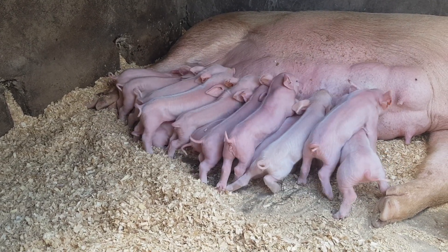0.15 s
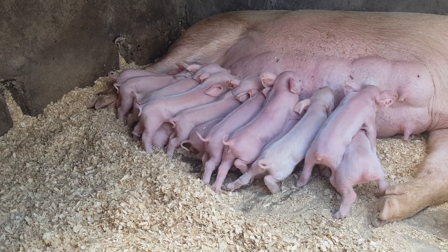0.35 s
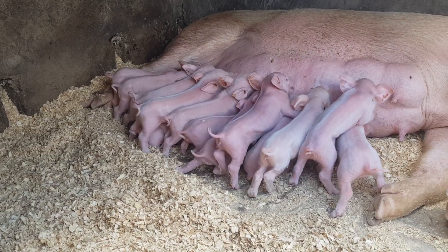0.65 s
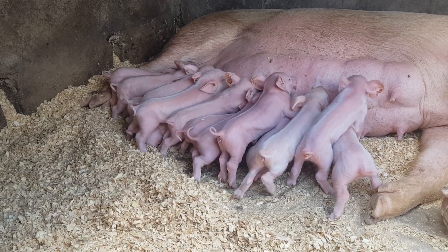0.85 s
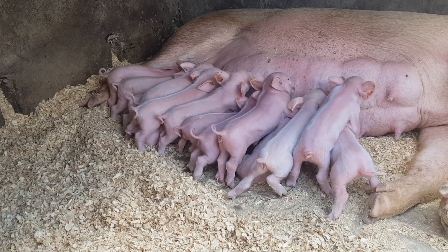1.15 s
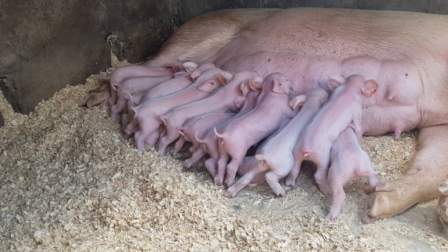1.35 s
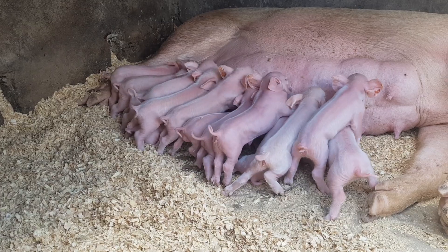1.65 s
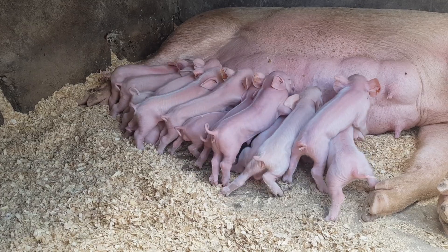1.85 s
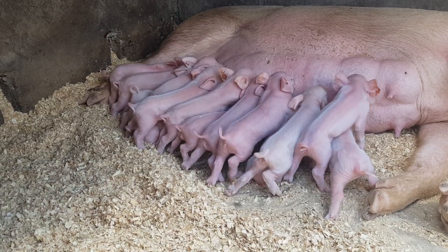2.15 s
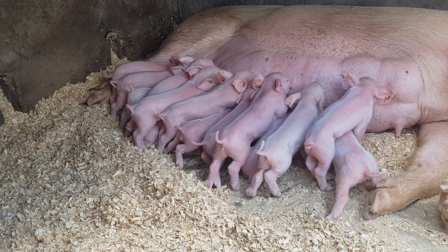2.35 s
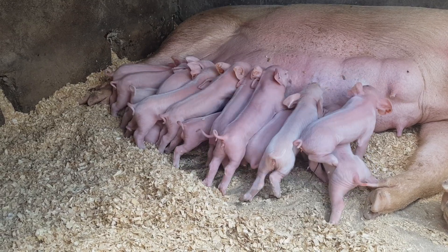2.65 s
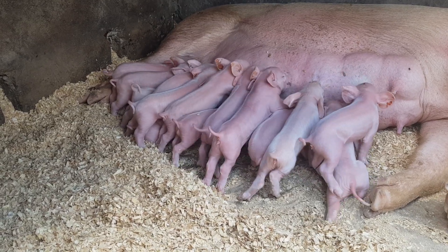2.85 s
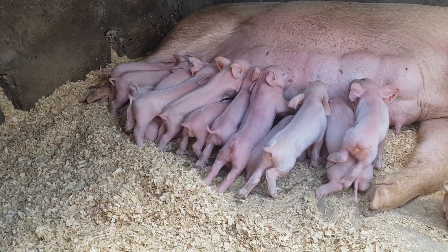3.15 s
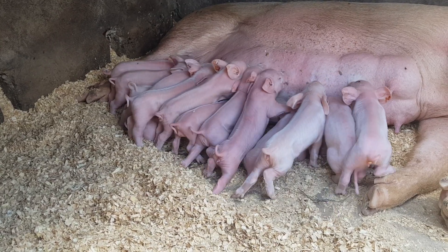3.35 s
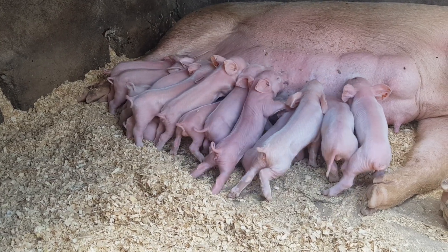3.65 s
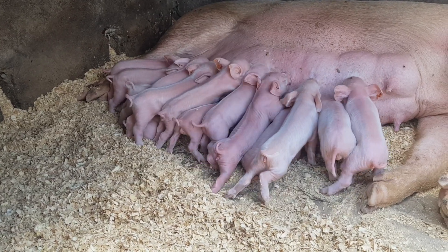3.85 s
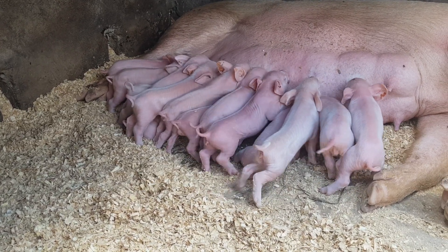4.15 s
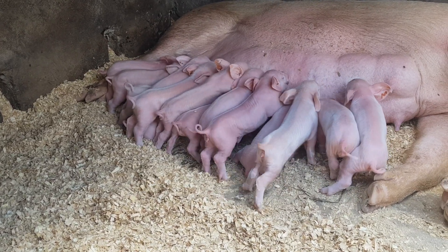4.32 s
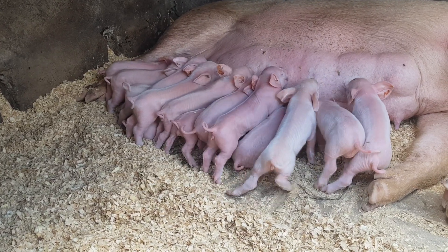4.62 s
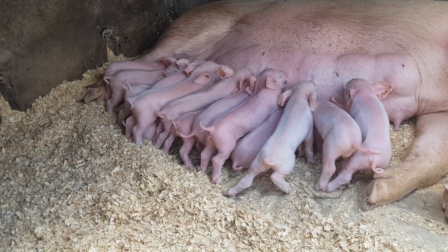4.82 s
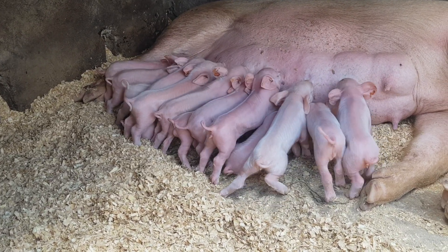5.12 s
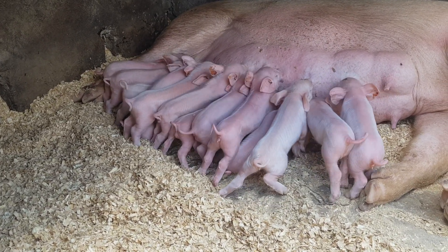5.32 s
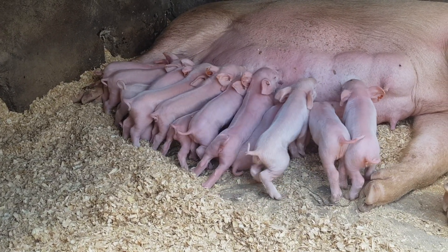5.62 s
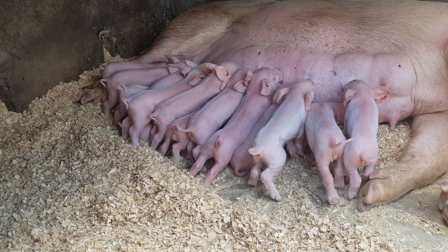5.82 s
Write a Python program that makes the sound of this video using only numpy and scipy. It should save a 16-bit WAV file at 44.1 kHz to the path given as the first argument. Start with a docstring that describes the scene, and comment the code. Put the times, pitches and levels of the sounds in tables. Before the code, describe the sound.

Low pulsing pig grunts, well spaced, over soft wet suckling, crackling bedding and a faint shed rumble, with tiny squeaks and wind bumps.

```python
"""Throughout, a shed rumbles low under jostling bodies, the sow's snuffling breath, suckling mouths and
rustling shavings. Soft calls are scattered throughout: wavering tones with one overtone. A sow in a concrete
pen gives four grunts, each a handful of slow vocal-fold flaps, about thirty a second, that swell, hold and die
away; they ring her chest, throat and snout and echo off the walls. Here and there bursts of tiny impulses make
wet smacks and dry scuffs, and slow swings of air pressure buffet the microphone. Late on come thin fluttering
whistles, most sliding down."""
import sys
import numpy as np
from scipy import signal
from scipy.fft import rfft, irfft, next_fast_len
from scipy.io import wavfile
from scipy.ndimage import uniform_filter1d

SR = 44100
rng = np.random.default_rng(int(sys.argv[2]) if len(sys.argv) > 2 else 0)


def dump(signal):
    """Clip the signal to [-1, 1] and save it as 16-bit WAV at the path in sys.argv[1]."""
    limited = np.clip(np.atleast_2d(signal).T, -1, 1)
    pcm = np.round(limited * 32767).astype(np.int16)
    wavfile.write(sys.argv[1], SR, pcm)


N = 263718
TIME = np.arange(N) / SR

# spectra of the steady beds, only their shape counts: (frequency [Hz], density [dB per Hz])
RUMBLE_SPECTRUM = [(18, -38), (32, -15.5), (45, 5), (62, -1.5), (100, -1.5), (135, -24), (220, -43)]
BODIES_SPECTRUM = [(80, -15), (135, 4.5), (180, -5.5), (260, -4), (400, -12.5), (650, -33)]
SNUFFLE_SPECTRUM = [(250, -30), (420, 4), (520, 0.5), (640, -1), (900, 0), (1080, -7.5), (1400, -15),
                    (2200, -30)]
SHAVINGS_SPECTRUM = [(3300, -27), (4200, -9), (5000, -7), (6300, -3.5), (7500, -14.5), (8600, -17),
                     (10500, -9.5), (12000, -7), (14000, -13), (15700, -14)]
SUCKLING_SPECTRUM = [(800, -1.5), (1400, -1.5), (2200, 2), (3000, 2), (3700, 0.5), (4600, -1.5), (6000, -4)]
# levels the beds hover around: (time [s], level [dB])
RUMBLE_LEVEL = [(0, -51), (.2, -42.5), (.6, -53.5), (1.6, -50.5), (3.9, -53), (4.1, -56.5), (4.6, -51),
                (5.1, -56.5), (5.25, -46.5), (5.98, -54)]
JOSTLING_LEVEL = [(0.0, -60), (0.8, -65.5), (1.89, -55.5), (2.59, -64.5), (2.79, -49.5), (3.49, -66.5),
                  (3.59, -53), (3.79, -65), (3.89, -54.5), (4.09, -66.5), (4.68, -53.0), (4.78, -59),
                  (5.08, -69.0), (5.98, -62)]
SNUFFLING_LEVEL = [(0.0, -66.5), (0.6, -56.5), (0.7, -72), (0.8, -58), (0.9, -67), (1.0, -61.5), (1.1, -70),
                   (1.59, -53.5), (2.19, -64.5), (3.39, -58.5), (3.99, -53), (4.09, -63.5), (4.58, -57.5),
                   (4.68, -72.5), (4.98, -60), (5.98, -62)]
RUSTLE_LEVEL = [(0, -56), (.8, -55.5), (.9, -54), (1.3, -57), (2, -56.5), (3.29, -54), (3.59, -59),
                (3.89, -53.5), (4.09, -59.5), (4.39, -55.5), (4.78, -60.5), (5.15, -56.5), (5.98, -56.5)]
SUCKLING_LEVEL = [(0, -58.5), (.25, -62.5), (.6, -58), (.9, -55.5), (1.5, -63), (1.6, -57.5), (2.99, -57.5),
                  (3.59, -61.5), (3.89, -56.5), (4.2, -68), (4.39, -56), (4.5, -62.5), (5.48, -58),
                  (5.98, -62.5)]
# soft closed-mouth grunts and piglet squeaks, levels before the swell: (time [s], length [s], start pitch [Hz],
# end pitch [Hz], level [dB], overtone against fundamental [dB], roughness [0 = steady])
CALLS = [(0.098, 0.14, 175, 165, -45.5, -48, 0.42), (0.104, 0.07, 404, 487, -48, -16, 0.54),
         (1.723, 0.13, 185.7, 171, -38.5, -34, 0.37), (1.81, 0.12, 173, 168, -49, -24.5, 0.97),
         (4.417, 0.088, 276.5, 242, -50, -14, 1.2), (4.517, 0.12, 198.7, 172, -56, -16, 0.84),
         (4.983, 0.075, 852, 876, -46.5, -34, 0.13), (5.652, 0.07, 498, 730, -49.5, -16, 1.12),
         (5.712, 0.033, 440, 358, -43, -13, 1.1)]
# the sow's grunts: (time of first strong flap [s], flap rate [Hz], rate glide [Hz/s], soft lead-in [s],
# lead-in against the grunt [dB], push [s], throat drive [dB], chest drive [dB])
GRUNTS = [(0.3176, 30.12, 20, 0.074, -14.5, 0.08, -23.5, -27),
          (1.31, 30.47, 41.6, 0.044, -7.5, 0.051, -33, -37),
          (2.8495, 30.46, 0.87, .11, -12, 0.048, -22, -28),
          (5.3094, 30.47, 12.5, 0.043, -23, 0.065, -26, -31)]
# resonances of the sow and her corner of the pen:
# (frequency [Hz], width [Hz], level [dB], left minus right [dB])
CHEST = [(44.4, 12, 2, 8), (62.8, 10.6, -2, 0), (107, 22, -5.5, 1), (117, 12, -3, 2), (150, 8.2, -14, 12),
         (185.6, 14.8, 2.5, 3.5), (192, 32, -23.5, 12)]
THROAT = [(270, 14, -5, 2), (348, 9, -5, -1), (417, 14, -13, 0), (482, 15, 3, 3), (543, 18, -1, 7),
          (633, 18, -13, 4), (754, 35, -6, 4), (850, 45, -6, 3), (884, 40, -3, 3), (932, 45, -6, 3)]
SNOUT = [(1070, 160, -13.5, 26), (1494, 94, -1, -6), (1810, 140, -29, 7), (2150, 150, 8.5, -2.5),
         (2290, 69, 1, 8), (2613, 70, -3.5, -19), (2770, 25, -7, -15), (3150, 35, -22, -5),
         (3093, 130, 1.5, -4)]
# flares of the snout as a grunt opens or closes: (time [s], drive [dB])
SNORTS = [(0.282, -52.5), (0.311, -22.5), (0.439, -42.5), (1.271, -45), (1.306, -48), (1.338, -40),
          (2.813, -45.5), (2.845, -35), (2.943, -39), (5.305, -36.5), (5.4, -45.5)]
# spectrum of the air torn by each flap: (frequency [Hz], density [dB per Hz])
RASP_SPECTRUM = [(700, -10), (920, 10.5), (1200, 1.5), (1800, -5), (3200, 0), (4200, -14), (6500, -24)]
# spectrum of breath through the nostrils: (frequency [Hz], density [dB per Hz])
HISS_SPECTRUM = [(2500, -2), (3600, -1.0), (4500, 0.5), (6000, -8.0), (7500, -21.5), (12000, -23)]
# wet smacks of mouths on teats, then trotters scuffing the shavings: (time [s], rise [s], decay [s],
# centre [Hz], width to either side [octaves], level [dB], left minus right [dB])
SMACKS = [(.69, 0.0033, 0.013, 2340, 0.47, -50.5, -4), (.718, 0.0039, 0.014, 2020, 0.53, -41, -1),
          (.722, 0.0032, 0.019, 710, 0.75, -41.5, 0), (.76, .003, 0.01, 970, 0.29, -48, 0),
          (.965, 0.0016, 0.011, 835, 0.27, -48.5, 0), (1.745, 0.011, 0.057, 2660, 0.33, -52.5, 1),
          (2.395, 0.0064, 0.085, 600, 1, -58, 9), (3.185, 0.0054, 0.039, 1180, 0.16, -51, -4),
          (4.332, 0.0017, 0.028, 1000, 0.27, -48, 1), (4.975, 0.0028, 0.0063, 1060, 0.58, -50, -7)]
SCUFFS = [(.605, 0.015, 0.019, 5460, 0.21, -46, -5), (.848, 0.0049, 0.016, 6300, 0.16, -49.5, -5),
          (.915, .008, 0.018, 7200, 0.19, -55, 0), (1.4546, 0.0025, 0.0095, 7000, 1, -48.5, 3),
          (1.6067, .001, .006, 5400, 0.23, -48, -4), (2.982, 0.0021, 0.032, 4400, 0.36, -41.5, -2),
          (3.21, 0.0074, 0.038, 5900, .35, -51.5, -5), (3.296, .002, 0.017, 11200, 0.31, -51, 2),
          (3.882, 0.0088, 0.011, 11900, 0.26, -41.5, 3), (4.91, 0.027, 0.049, 11900, 0.27, -47, 0),
          (4.925, 0.042, 0.03, 5630, 0.23, -46.5, -5), (5.733, 0.0033, 0.02, 5750, 0.24, -50.5, -4)]
# puffs of air on the microphone: (time of the middle [s], half length [s], eddy rate [Hz], peak [dB],
# left minus right [dB])
PUFFS = [(1.224, 0.031, 56.8, -30, 29), (1.293, 0.02, 52, -29, -23), (2.398, .018, 61, -35, 26),
         (2.57, 0.023, 51.2, -38, 17), (5.684, 0.016, 83.6, -14, -44), (5.722, 0.027, 145.6, -35.5, -30),
         (5.749, 0.026, 70.5, -28, -33), (5.803, 0.013, 72, -22, -37), (5.847, .02, 65, -32, -33),
         (5.917, 0.026, 61, -25, -29)]
# thin whistles: (time of the peak [s], rise [s], fall [s], start pitch [Hz], end pitch [Hz], peak [dB])
WHISTLES = [(4.735, .175, .2, 2154, 2022, -50.5), (4.965, 0.051, 0.041, 2050, 2055, -59),
            (5.122, 0.045, .07, 2100, 1990, -64), (5.97, .14, 0.07, 2180, 2115, -63)]

# every grunt swells to a crest, holds while she pushes, then dies away
CREST_S, SWELL_DB_PER_S, RELEASE_DB_PER_S, RELEASE_S = 0.022, 147, 346, .1
# the chest swells more gently, lets go later, and takes only a share of the lead-in's softness
CHEST_LAG_S, CHEST_SWELL_DB_PER_S, CHEST_LEAD_SHARE = 0.026, 59, .35
SNOUT_DB, RASP_DB = -20, -19.5  # snout drive and rasp, relative to the throat drive
SNORT_FALL_DB_PER_S = 275
WHISTLE_FADE_DB, WHISTLE_ROUNDNESS = 22, 1.2  # fall from the peak to either end; power of that fall
TOP_HZ = 15600


def undb(db):
    """Decibels to gain."""
    return 10 ** (np.asarray(db) / 20)


def unit(x):
    """Scale to an rms of one."""
    return x / np.sqrt(np.mean(x ** 2) + 1e-20)


def sides(pan_db):
    """Left and right gains of constant power, as a column."""
    return unit(undb(np.array([[pan_db], [-pan_db]]) / 2))


def level_curve(rows):
    """A level table joined by straight lines in time, in dB."""
    s, db = np.transpose(rows)
    return np.interp(TIME, s, db)


def add(out, s, sound):
    """Mix a stereo sound in at a time."""
    i = max(int(s * SR), 0)
    out[:, i:i + sound.shape[1]] += sound[:, :max(N - i, 0)]


def colour(x, spectrum):
    """Give a sound a spectrum and an rms of one."""
    size = next_fast_len(N)
    hz, db = np.transpose(spectrum)
    log_hz = np.log(np.fft.rfftfreq(size, 1 / SR) + 1)
    gain = undb(np.interp(log_hz, np.log(hz), db, left=-90, right=-90))
    return unit(irfft(rfft(x, size) * gain, size)[..., :N])


def walk(rate):
    """Random levels, each held 1 / rate s, then smoothed twice; spread near one."""
    k = int(SR / rate)
    steps = np.repeat(rng.standard_normal(N // k + 1), k)
    return 1.3 * uniform_filter1d(uniform_filter1d(steps, k), k)[:N]


def stereo_noise(likeness):
    """Left and right noise with a share of their power in common."""
    c = np.clip(likeness, 0, .99)
    return np.sqrt(c) * rng.standard_normal(N) + np.sqrt(1 - c) * rng.standard_normal((2, N))


def pen(x, tail_db, t60, echo=0., lag_s=0.):
    """Concrete pen: direct sound, right side late by the lag, a slap off the back wall and a diffuse tail."""
    t = np.arange(SR // 2) / SR
    tail = rng.standard_normal((2, len(t))) * np.exp(-np.log(1000) * t / t60) * (t > .003)
    response = undb(tail_db) * unit(tail) / np.sqrt(len(t))
    response[0, 0] += 1
    response[1, int(abs(lag_s) * SR)] += 1
    response[0, int(.0078 * SR)] += echo
    response[1, int(.0058 * SR)] += echo
    response = unit(response) / np.sqrt(len(t))  # unit energy, so the pen keeps the level
    return signal.fftconvolve(x, response, axes=1)[:, :x.shape[1]]


def shed_rumble(wander_db=0.66):
    """Low rumble of the shed: bass noise, nearly alike on both sides, that wanders in level."""
    noise = colour(stereo_noise(0.84), RUMBLE_SPECTRUM)
    return noise * undb(level_curve(RUMBLE_LEVEL) + wander_db * walk(9))


def jostling_bodies(bump_db=4.5):
    """Bodies jostling against the belly: dull noise that bumps up and down."""
    noise = colour(stereo_noise(0.82), BODIES_SPECTRUM)
    return noise * undb(level_curve(JOSTLING_LEVEL) + bump_db * walk(25))


def sow_snuffling(sniff_db=3.0):
    """The sow snuffles through her snout: mid-range noise with a quick unsteady level."""
    noise = colour(stereo_noise(0.36), SNUFFLE_SPECTRUM)
    return noise * undb(level_curve(SNUFFLING_LEVEL) + sniff_db * walk(30))


def rustling_shavings(stir, grain_db=2.5, crackle_db=-7, shuffle_db=1.82, flicker_db=.6):
    """Dry flakes crackle under small feet: sparse impulses of uneven size over a fine hiss."""
    sparse = rng.standard_normal((2, N)) * (rng.random((2, N)) < .06)
    flakes = sparse * undb(grain_db * np.minimum(rng.exponential(size=(2, N)), 7))
    mix = stereo_noise(0) + undb(crackle_db) * unit(flakes)
    db = level_curve(RUSTLE_LEVEL) + shuffle_db * stir + flicker_db * walk(45)
    return sides(pan_db=-1.1) * colour(mix, SHAVINGS_SPECTRUM) * undb(db)


def suckling_mouths(stir, gulp_db=0.57, flicker_db=.6):
    """Suckling mouths blend into a soft wet hiss of flickering noise."""
    db = level_curve(SUCKLING_LEVEL) + gulp_db * stir + flicker_db * walk(35)
    return sides(pan_db=-2.5) * colour(stereo_noise(0), SUCKLING_SPECTRUM) * undb(db)


def calls(waver=0.096, shimmer_db=4):
    """Short swelling notes with one overtone; the rougher they are, the more pitch and loudness shake."""
    out = np.zeros((2, N))
    for s, length, start_hz, end_hz, db, overtone_db, rough in CALLS:
        u = np.linspace(0, 1, int(length * SR))
        glide_hz = start_hz + (end_hz - start_hz) * u
        hz = glide_hz * (1 + waver * rough * walk(179)[:len(u)])
        phase = 2 * np.pi * np.cumsum(hz) / SR
        tone = np.sin(phase) + undb(overtone_db) * np.sin(2 * phase)
        note = unit(tone * undb(shimmer_db * rough * walk(220)[:len(u)]))
        swell = np.sin(np.pi * u) ** 2
        add(out, s, sides(pan_db=1.5) * undb(db) * note * swell)
    return pen(out, tail_db=-7, t60=0.25)


def ring(modes, edge_hz, twist):
    """Stereo ring of unit energy; each mode lags the one before by `twist` radians, so the ring builds."""
    t = np.arange(SR // 2) / SR
    response = np.zeros((2, len(t)))
    for k, (hz, width, db, pan) in enumerate(modes):
        decay = np.sqrt(width) * np.exp(-np.pi * width * t)
        response += sides(pan) * undb(db) * decay * np.cos(2 * np.pi * hz * t - twist * k)
    band = signal.butter(4, [modes[0][0] * 0.79, edge_hz], "band", fs=SR, output="sos")
    return unit(signal.sosfilt(band, response)) / np.sqrt(len(t))


def folds(t, start, rate, glide, gains, breathiness, puff_s, leak_db=-47, jitter=.015):
    """One click a flap, a puff of turbulent air after it, and a trickle of air between flaps."""
    count = np.arange(-4, 8)  # negative flaps lead in
    uneven_count = count + jitter * rng.standard_normal(len(count))
    flaps = start + uneven_count / (rate + glide * count / rate / 2)
    flaps = flaps[(flaps > t[0]) & (flaps < t[-1])]
    at = ((flaps - t[0]) * SR).astype(int)
    clicks, trickle = np.zeros((2, len(t) + SR // 2))  # room for the ring to die away
    clicks[at] = gains[at] * np.sqrt(SR / rate)
    trickle[:len(t)] = np.minimum(gains, undb(leak_db))
    keep = np.exp(-2 / (puff_s * SR))
    share = np.clip(breathiness, 0, 1)
    puff_power = signal.lfilter([1 - keep], [1, -keep], clicks ** 2)
    air_power = share * puff_power + trickle ** 2
    air = np.sqrt(air_power) * rng.standard_normal(len(clicks))
    return (np.sqrt(1 - share) * clicks + air)[None]


def effort(age, push_s, swell):
    """Level in dB over the age of a grunt: swell, hold, release."""
    return -swell * np.maximum(CREST_S - age, 0) - RELEASE_DB_PER_S * np.maximum(age - push_s, 0)


def snorts(t):
    """Gain of the snout's flares: each opens at once and closes steadily in dB."""
    return sum((t > s) * undb(db - SNORT_FALL_DB_PER_S * np.abs(t - s)) for s, db in SNORTS)


def rasp(air):
    """Each flap tears a short burst of air that no resonance narrows."""
    return undb(RASP_DB) * colour(air, RASP_SPECTRUM) * np.sqrt(np.mean(air ** 2))


def nostril_hiss(flow, air_db=-41.5):
    """Air hisses through the nostrils while she pushes: noise scaled by the smoothed flow."""
    hiss = colour(stereo_noise(0), HISS_SPECTRUM)
    return undb(air_db) * uniform_filter1d(flow, size=900) * hiss * sides(pan_db=-3.5)


def sow(air_follow=0.42):
    """Slow flaps ring chest, throat and snout; the higher the resonance, the more breath is in it."""
    low, mid, high, torn = np.zeros((4, 2, N))
    flow = np.zeros(N)
    chest = ring(CHEST, edge_hz=196, twist=2.26)
    throat = ring(THROAT, edge_hz=1630, twist=1.426)
    snout = ring(SNOUT, edge_hz=3000, twist=1.93)
    for s, rate, glide, lead_s, lead_db, push_s, throat_db, chest_db in GRUNTS:
        age = np.arange(-lead_s, push_s + RELEASE_S, 1 / SR)
        t = s + age
        soft_db = lead_db * (age < -.5 / rate)
        db = throat_db + soft_db + effort(age, push_s, SWELL_DB_PER_S)
        chest_effort = effort(age - CHEST_LAG_S, push_s, CHEST_SWELL_DB_PER_S)
        deep_db = chest_db + CHEST_LEAD_SHARE * soft_db + chest_effort
        nasal = np.hypot(undb(db + SNOUT_DB), snorts(t))
        flaps = t, s, rate, glide
        chest_flaps = folds(*flaps, undb(deep_db), breathiness=0.082, puff_s=0.018)
        throat_flaps = folds(*flaps, undb(db), breathiness=0.36, puff_s=0.02)
        snout_flaps = folds(*flaps, nasal, breathiness=0.65, puff_s=0.0073)
        add(low, t[0], signal.fftconvolve(chest_flaps, chest))
        add(mid, t[0], signal.fftconvolve(throat_flaps, throat))
        add(high, t[0], signal.fftconvolve(snout_flaps, snout))
        add(torn, t[0], folds(*flaps, undb(db), breathiness=0.96, puff_s=0.0097))
        flow += np.interp(TIME, t, undb(air_follow * db), left=0, right=0)
    body = pen(low, tail_db=-17, t60=0.4) + pen(mid, tail_db=-5, t60=0.14, echo=0.5, lag_s=0.00026)
    nose = pen(high, tail_db=6.5, t60=0.16, echo=0.19, lag_s=0.0004)
    return body + nose + pen(rasp(torn), tail_db=4.5, t60=0.26) + nostril_hiss(flow)


def bursts(rows, grain_db):
    """Swelling and dying clouds of tiny impulses, each in its own band."""
    out = np.zeros((2, N))
    t = np.arange(SR // 4) / SR
    f = np.fft.rfftfreq(len(t), 1 / SR) + 1
    for s, rise, decay, hz, octaves, db, pan_db in rows:
        grains = rng.standard_normal((2, len(t))) * undb(grain_db * rng.exponential(size=(2, len(t))))
        shape = np.minimum(t / rise, 1) * np.exp(-np.maximum(t - rise, 0) / decay)
        band = np.exp(-(np.log2(f / hz) / octaves) ** 2 / 2)
        cloud = shape * irfft(rfft(grains) * band, len(t))
        # even out the sides, then restore the shape's own loudness
        cloud = np.array([unit(c) for c in cloud]) * np.sqrt(np.mean(shape ** 2))
        add(out, s, undb(db) * sides(pan_db) * cloud)
    return out


def smacks_and_scuffs():
    """Wet mouths and dry trotters, as bursts of impulses in the pen; the smacks are the spikier."""
    return pen(bursts(SMACKS, grain_db=3) + bursts(SCUFFS, grain_db=1.5), tail_db=-15, t60=0.2)


def puffs(unsteady=0.36):
    """Eddies roll over the microphone: a few slow, uneven swings of pressure each."""
    out = np.zeros((2, N))
    for s, length, hz, db, pan_db in PUFFS:
        t = np.arange(-3 * length, 3 * length, 1 / SR)
        uneven_hz = hz * (1 + unsteady * walk(150.0)[:len(t)])
        phase = 2 * np.pi * (np.cumsum(uneven_hz) / SR + rng.random())
        add(out, s + t[0], sides(pan_db) * undb(db) * np.sin(phase) * np.exp(-(t / length) ** 2))
    return out


def whistles(waver=.004, flutter_db=2.5):
    """A thin, fluttering whistle from a narrow airway: it swells and fades while its pitch slides."""
    out = np.zeros((2, N))
    for s, rise, fall, start_hz, end_hz, peak_db in WHISTLES:
        t = np.arange(-rise, fall, 1 / SR)
        hz = np.linspace(start_hz, end_hz, len(t)) * (1 + waver * walk(183)[:len(t)])
        tone = unit(np.sin(2 * np.pi * np.cumsum(hz) / SR))
        fade_db = WHISTLE_FADE_DB * np.maximum(-t / rise, t / fall) ** WHISTLE_ROUNDNESS
        db = peak_db - fade_db + flutter_db * walk(53.3)[:len(t)]
        add(out, s - rise, sides(pan_db=6) * undb(db) * tone)
    return pen(out, tail_db=-10, t60=.3)


def scene():
    """The sow, her litter and the air around them."""
    stir = walk(14)  # shavings and mouths rise and fall together
    shed_litter_and_breath = sides(pan_db=1.5) * (shed_rumble() + jostling_bodies() + sow_snuffling())
    beds = shed_litter_and_breath + rustling_shavings(stir) + suckling_mouths(stir)
    return beds + calls() + sow() + smacks_and_scuffs() + puffs() + whistles()


def record(dry):
    """The microphone drops the deepest bass and the recorder cuts the top."""
    thin = signal.sosfilt(signal.butter(4, 31, "high", fs=SR, output="sos"), dry)
    return signal.sosfilt(signal.ellip(10, .2, 80, TOP_HZ, fs=SR, output="sos"), thin)


dry = scene()
out = record(dry)
dump(out)
```